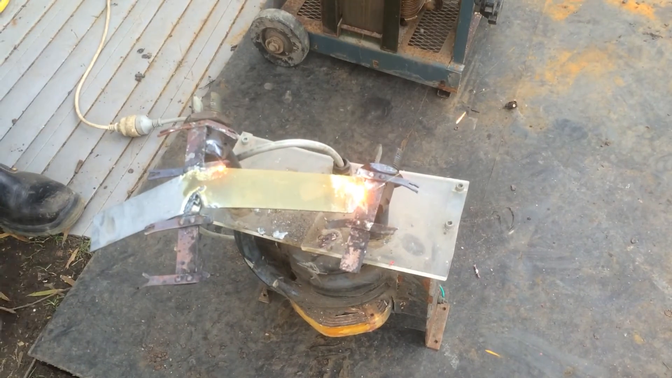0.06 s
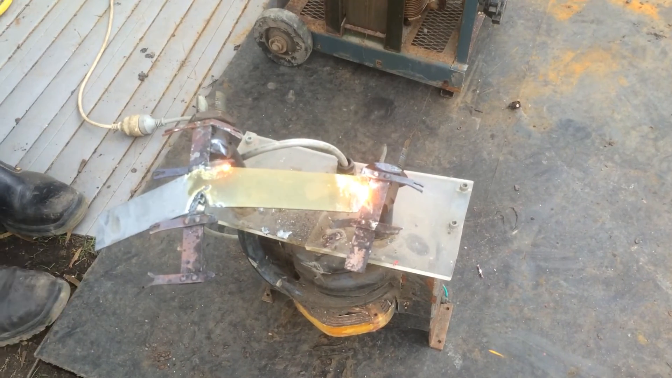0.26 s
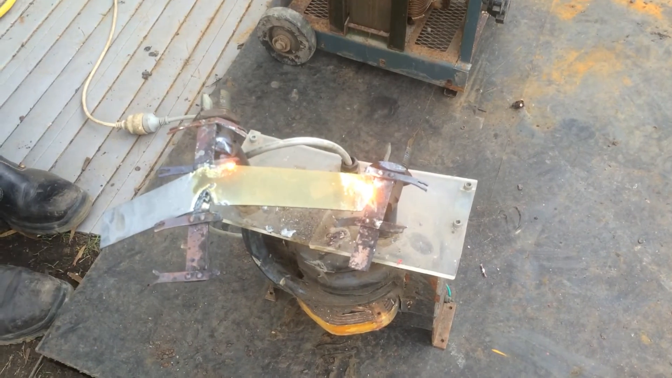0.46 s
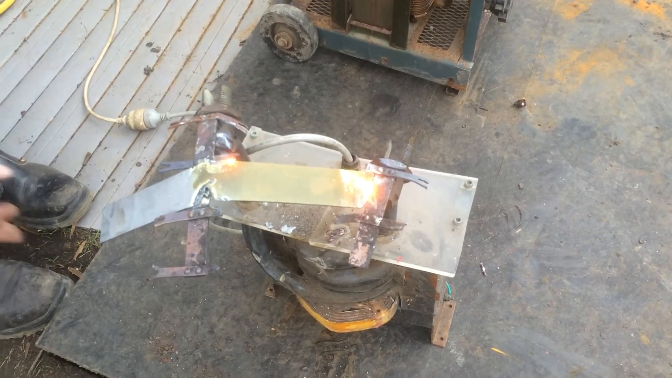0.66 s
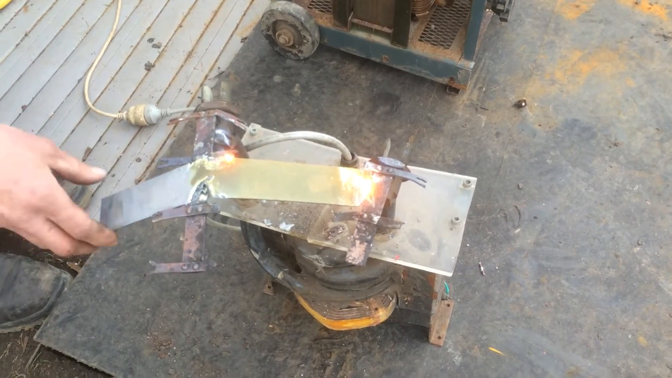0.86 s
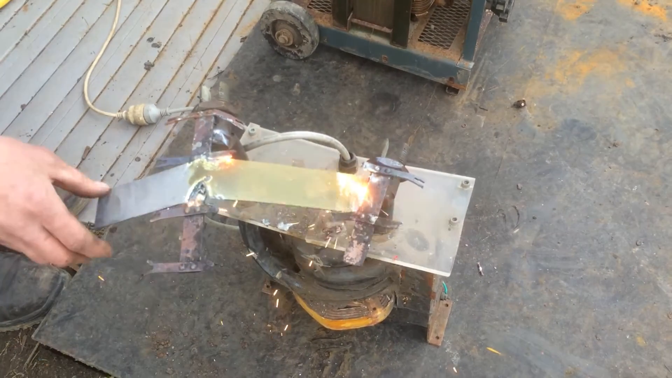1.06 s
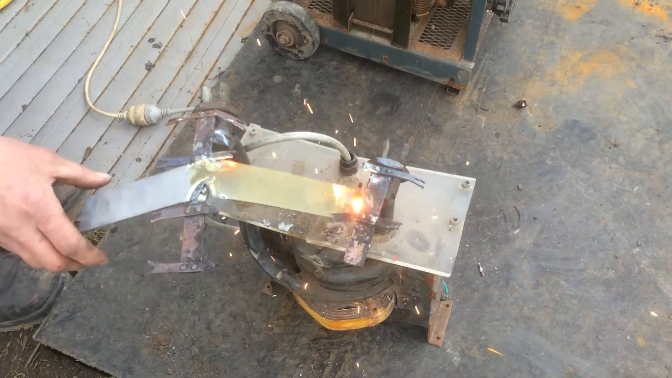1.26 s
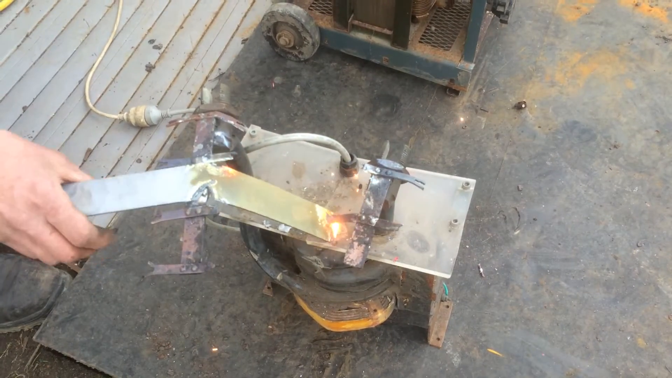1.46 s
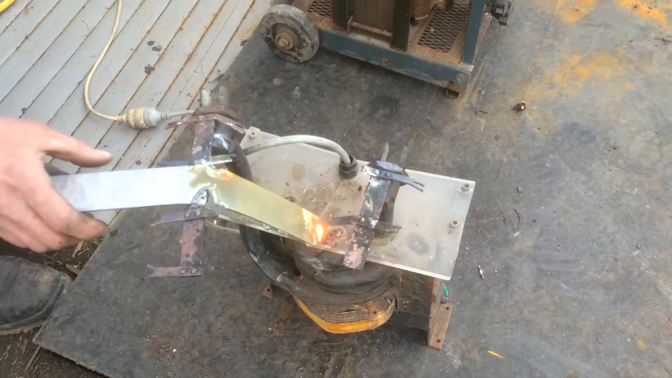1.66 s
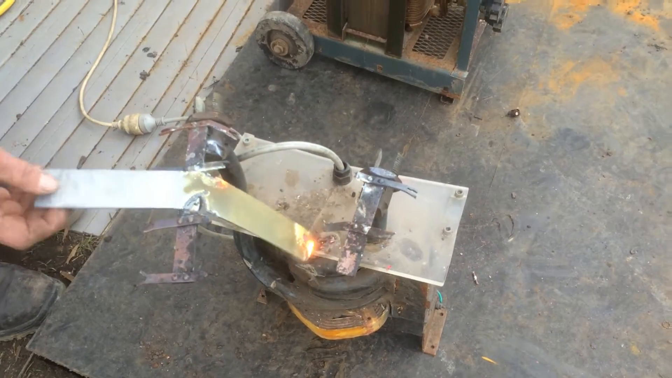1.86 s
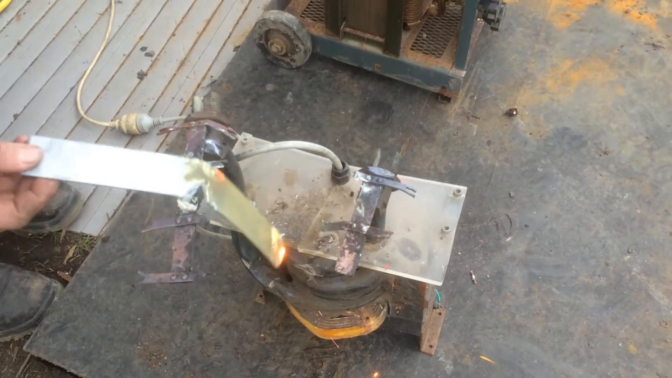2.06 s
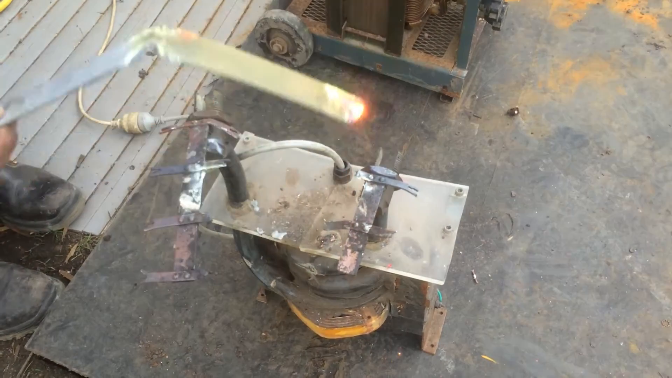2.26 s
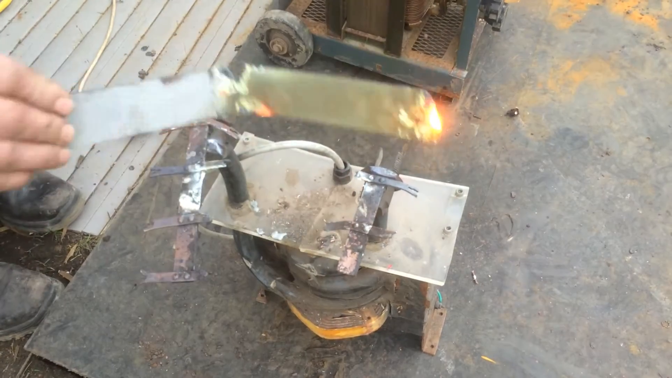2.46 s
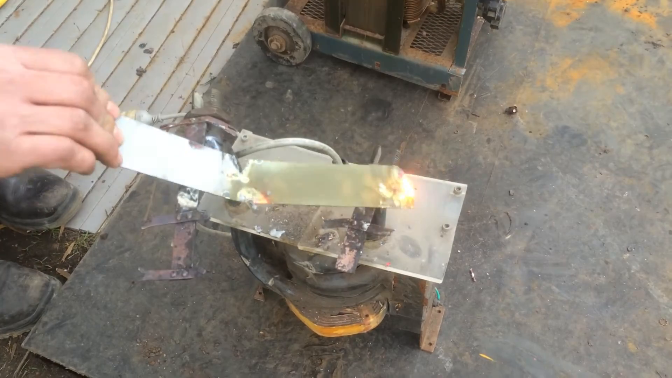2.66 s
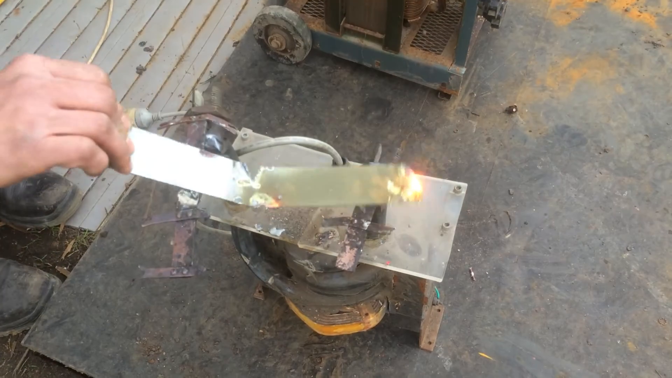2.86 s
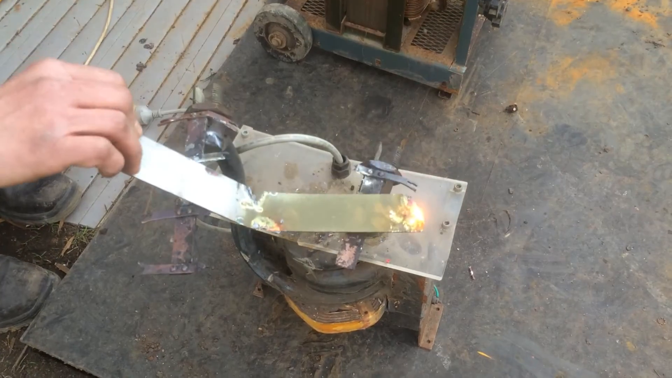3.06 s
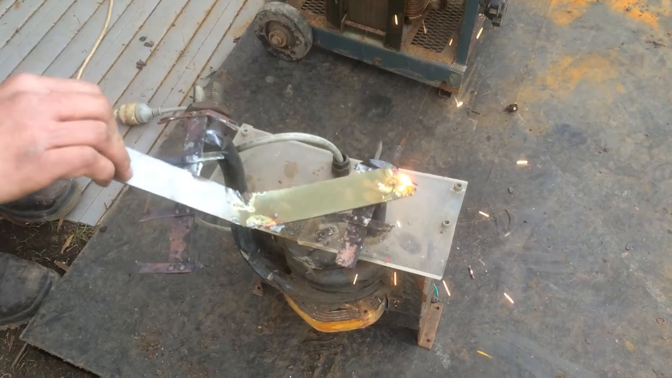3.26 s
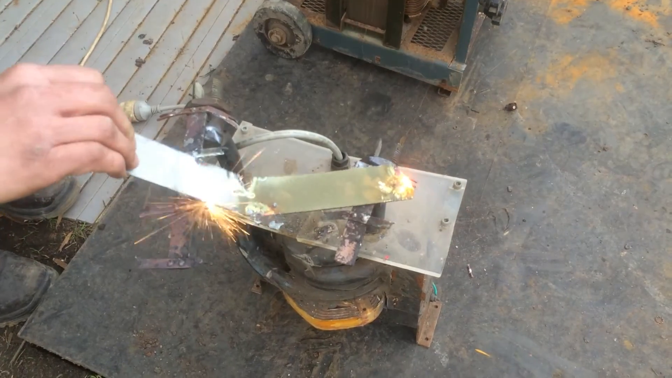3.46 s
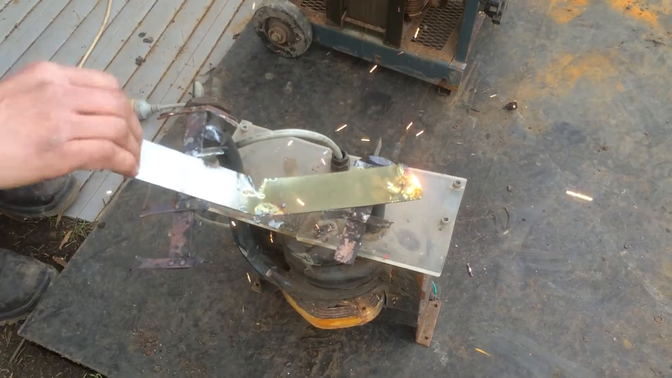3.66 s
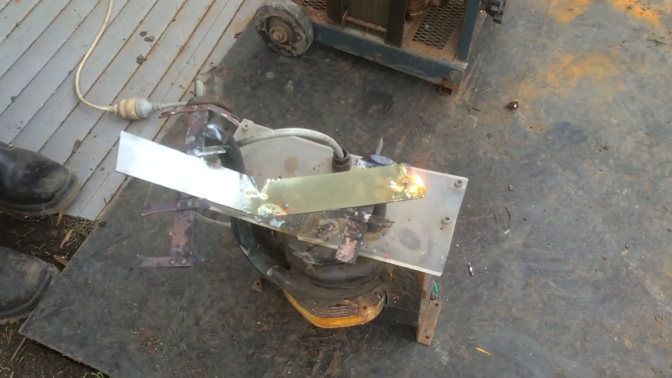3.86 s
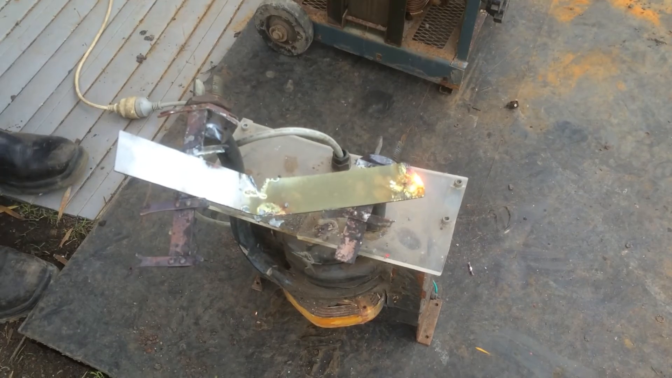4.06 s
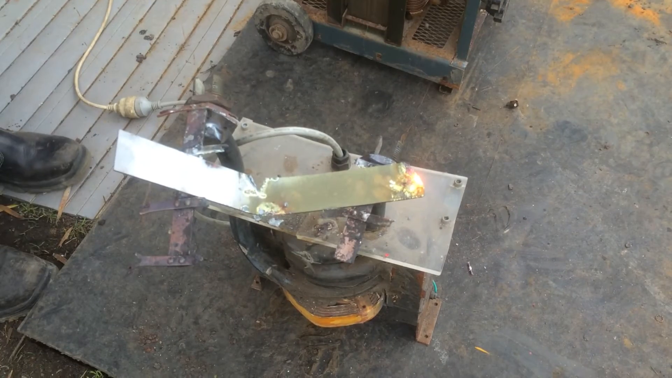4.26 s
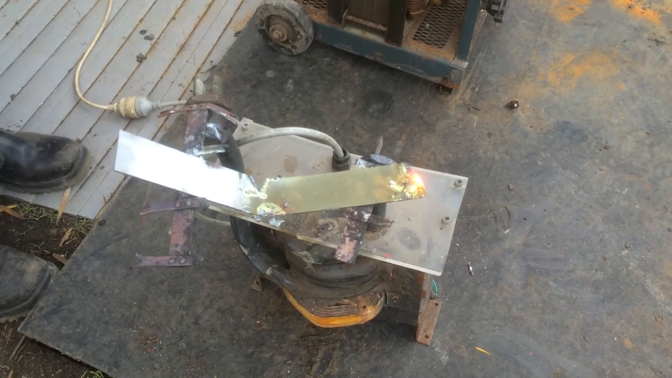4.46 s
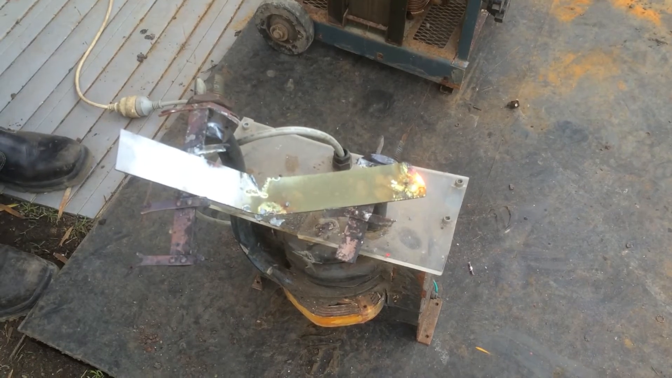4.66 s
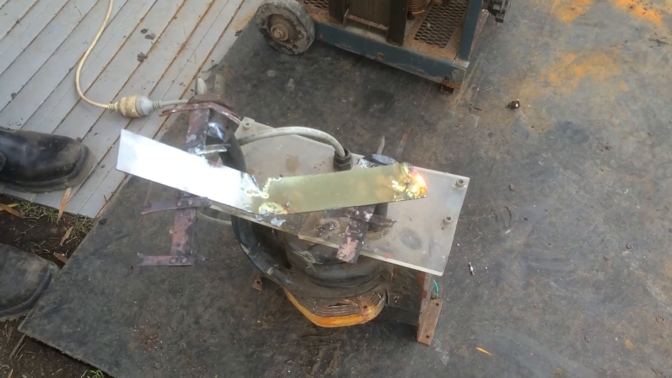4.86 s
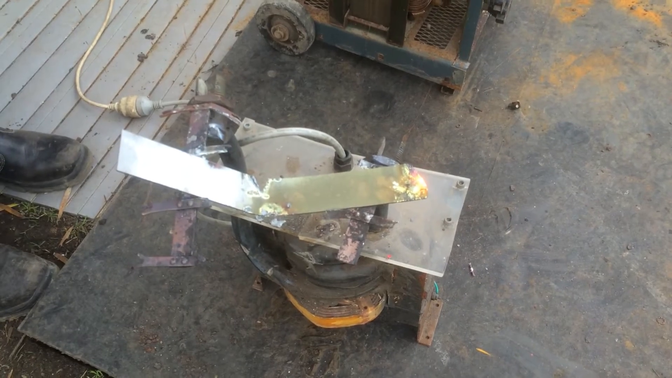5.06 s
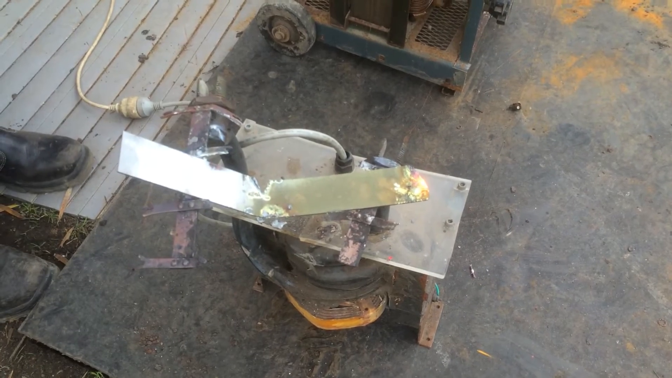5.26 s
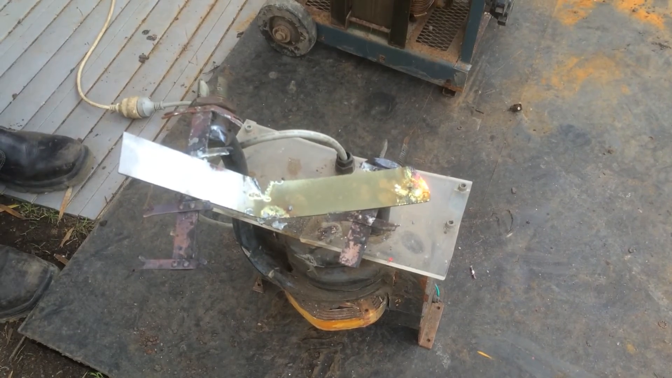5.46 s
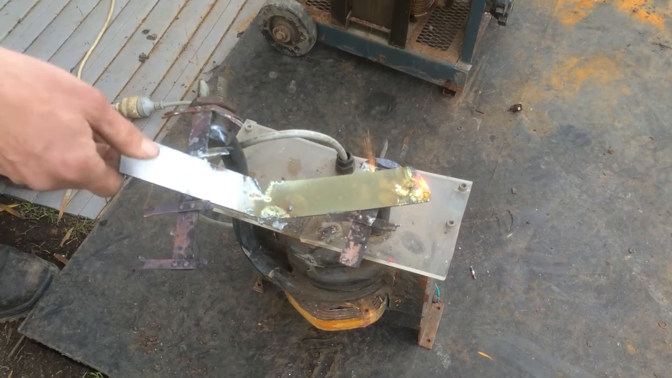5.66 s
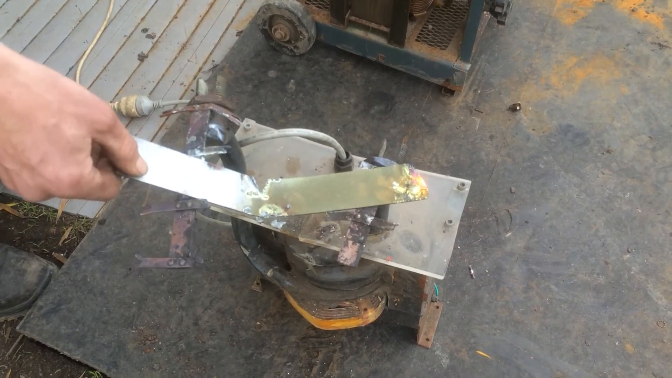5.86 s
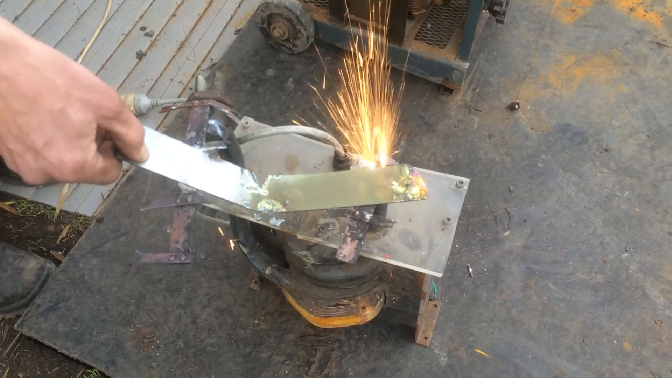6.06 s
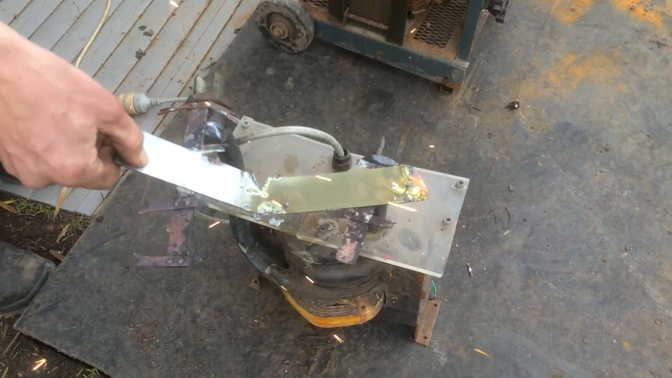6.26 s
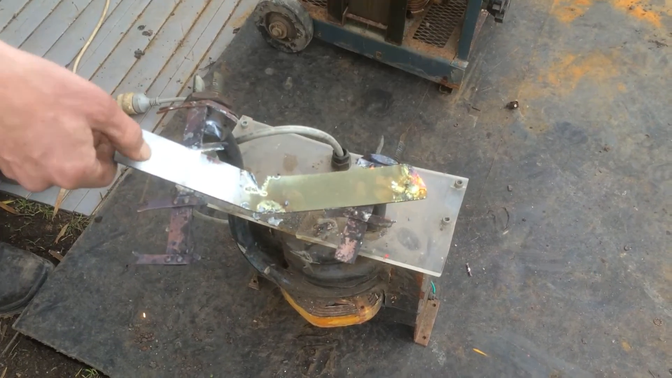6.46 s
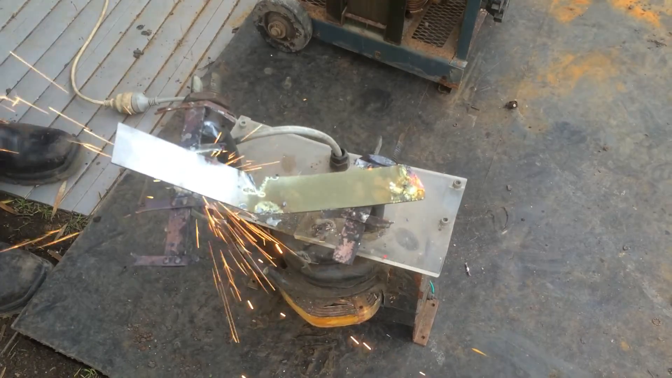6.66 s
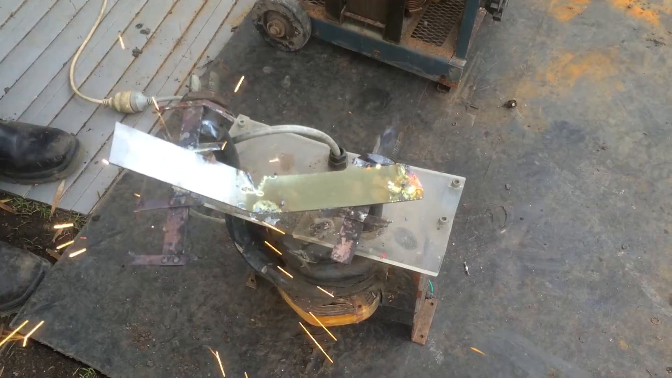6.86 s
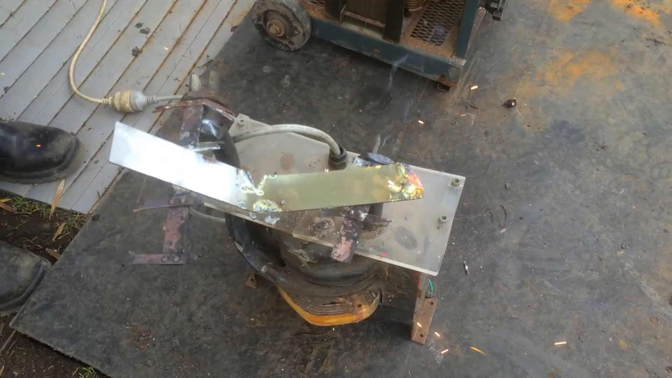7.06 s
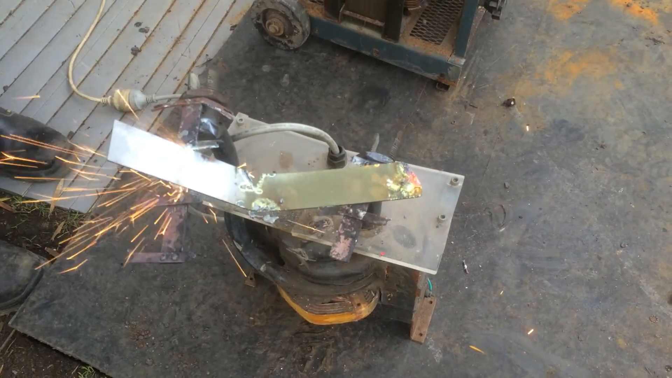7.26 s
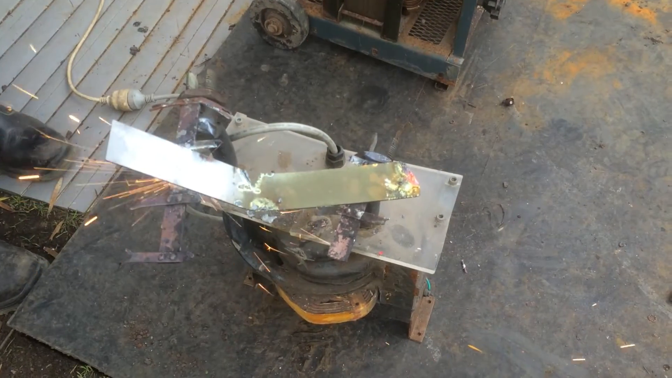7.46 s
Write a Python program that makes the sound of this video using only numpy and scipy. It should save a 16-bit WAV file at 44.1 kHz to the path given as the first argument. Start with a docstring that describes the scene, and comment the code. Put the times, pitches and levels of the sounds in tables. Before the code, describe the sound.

Loud, dry arcing snaps burst irregularly in clusters over a quiet yard, some jolting the microphone, trailing frying sizzle above a soft low engine hum.

```python
"""Arcing steel bar

Outdoors, a glowing steel bar pushed against the terminal of a home-made high-current transformer arcs in volleys.
Each spark is a noise crack and spray with a ground echo; the hardest blasts add decaying pressure jolts.
Between them come sizzle (hiss of leaping level), droplets (random ticks), and scrapes (resonant noise bands).
Behind lie two soft steps (dull noise bumps), open air (shaped noise), a sine hum and a slowing engine (two sines)."""
import sys
import numpy as np
from scipy import signal
from scipy.fft import rfft, irfft
from scipy.io import wavfile
from scipy.ndimage import minimum_filter1d

SR = 44100
rng = np.random.default_rng(int(sys.argv[2]) if len(sys.argv) > 2 else 0)


def digitize_waveform(pressure):
    """Quantize a signal to 16-bit integers and store it at the path in sys.argv[1].

    Rows of a 2-D input are taken as channels; values are limited to [-1, 1].
    """
    field = np.atleast_2d(pressure).T
    bounded = np.clip(field, -1, 1)
    quanta = np.round(bounded * 32767).astype(np.int16)
    wavfile.write(sys.argv[1], SR, quanta)


N = 331632

# the ground reflection, relative to the direct sound
GROUND_DELAY_S, GROUND_DB = .00232, -10.5


def from_db(db):
    """Amplitude ratio: 20 dB for each factor of ten."""
    return 10 ** (np.asarray(db) / 20)


def rms_one(x):
    """Energy normalization: scale to unit rms."""
    return x / np.sqrt(np.mean(x ** 2) + 1e-20)


def in_time(rows):
    """Linear interpolation: each column of a time curve, at every sample."""
    s, *columns = np.transpose(rows)
    return [np.interp(np.arange(N) / SR, s, c) for c in columns]


def cut(x, hz, kind, order=2):
    """Butterworth filtering: a maximally flat pass band."""
    return signal.sosfilt(signal.butter(order, np.clip(hz, 10, .45 * SR), kind, fs=SR, output="sos"), x)


def drift(rate):
    """Random modulation: chance values, rate per second, joined by straight lines; unit rms."""
    knots = rng.standard_normal(int(N / SR * rate) + 2)
    return rms_one(np.interp(np.arange(N) / SR * rate, np.arange(len(knots)), knots))


def coloured(x, spectrum, size=2048):
    """Minimum-phase filtering: folding the cepstrum makes a causal response with the given spectrum."""
    hz = np.maximum(np.arange(size + 1) * SR / (2 * size), 1)
    points = np.array(spectrum)
    gain_db = np.interp(np.log(hz), np.log(points[:, 0]), points[:, 1])
    cepstrum = irfft(np.log(from_db(gain_db)))
    cepstrum[1:size] *= 2
    cepstrum[size + 1:] = 0
    response = irfft(np.exp(rfft(cepstrum)))
    return signal.fftconvolve(x, response)[:len(x)]


def add(out, s, sound):
    """Superposition: mix a sound in at time s."""
    at = min(max(round(s * SR), 0), N - 1)
    out[at:at + len(sound)] += sound[:N - at]


def air_and_hum(hum_hz=101.1, hum_db=3, waver_db=3.0):
    """Broadband noise and a tone: shaped outdoor air, with a wavering hum that follows its level."""
    # open air: (time [s], level between 300 and 2000 Hz [dB])
    air_levels = [(0, -62.5), (1.3, -62.5), (2.6, -60.5), (3.8, -61), (4.3, -57), (4.9, -64), (5.7, -62),
                  (6.1, -64), (7.5, -63.5)]
    # spectrum of open air: (frequency [Hz], relative gain [dB])
    air_spectrum = [(20, -23), (65, -3), (160, -5.5), (380, -19), (1100, -19.5), (1900, -23), (2700, -34),
                    (6000, -40.5), (15000, -53)]
    level_db, = in_time(air_levels)
    air = coloured(rng.standard_normal(N), air_spectrum)
    air = air / np.std(cut(air, [300, 2000], "band"))
    hum = np.sqrt(2) * np.sin(2 * np.pi * hum_hz * np.arange(N) / SR)
    wavering_hum = from_db(hum_db + waver_db * drift(15)) * hum
    return from_db(level_db) * (air + wavering_hum)


def engine(second_db=-21.5, waver_db=3.5):
    """Harmonic radiation: only the firing rate and a trace of its octave carry this far."""
    # distant engine: (time [s], firing rate [Hz], level of the fundamental before its waver [dB])
    engine_course = [(0, 96, -70.5), (1.35, 92.6, -57), (1.52, 90.2, -51.5), (2.55, 88.34, -50.5),
                     (3.5, 79, -52.5), (4.1, 76.6, -72.5), (4.4, 77.1, -60.5), (4.8, 71.8, -65),
                     (5.15, 69.93, -51.5), (7.5, 66.6, -61.5)]
    hz, level_db = in_time(engine_course)
    phase = 2 * np.pi * np.cumsum(hz) / SR
    tone = np.sin(phase) + from_db(second_db) * np.sin(2 * phase)
    return np.sqrt(2) * from_db(level_db + waver_db * drift(3.7)) * tone


def steps(low_hz=100, top_hz=230, fall_s=0.014, scuff_db=-15, scuff_top_hz=1600, size=6000):
    """Damped impact: a boot shifts on the mat, a dull decaying bump with a light scuff of the sole."""
    # soft steps beside the rig: (time [s], peak level [dB])
    footfalls = [(0.318, -38), (.402, -45)]
    out, fade = np.zeros(N), np.exp(-np.arange(size) / SR / fall_s)
    for s, db in footfalls:
        heel, sole = rng.standard_normal((2, size))
        thud = rms_one(cut(heel, [low_hz, top_hz], "band"))
        scuff = from_db(scuff_db) * rms_one(cut(sole, scuff_top_hz, "low"))
        bump = fade * (thud + scuff)
        add(out, s, from_db(db) * bump / np.abs(bump).max())
    return out


def scrapes():
    """Friction-driven resonance: rubbing sets the bar's modes singing for a moment."""
    # the bar drags over the terminal: (time [s], length [s], level [dB])
    rubs = [(3.004, .055, -57.5), (3.065, 0.029, -59), (3.203, 0.27, -65.5), (3.753, 0.053, -38)]
    # resonances of the dragged bar: (frequency [Hz], bandwidth [Hz], relative level [dB])
    bar_modes = [(1500, 630, -1.5), (5550, 360, -12), (6490, 350, -2.5)]
    rub = np.zeros(N)
    for s, length_s, db in rubs:
        size = round(length_s * SR)
        add(rub, s, from_db(db) * signal.windows.tukey(size))
    rings = np.zeros(N)
    for hz, width, db in bar_modes:
        mode = cut(rng.standard_normal(N), [hz - width / 2, hz + width / 2], "band", order=1)
        rings += from_db(db) * rms_one(mode)
    return rub * rms_one(rings)


def droplets(low_hz=8000, per_s=160, spread_db=21, tick_s=.0003):
    """Random impulse process: droplets burst, most faintly, in bright ticks that the ground echoes."""
    # showers of flying droplets: (time of the thickest [s], level there [dB], Gaussian spread in time [s])
    showers = [(.3, -68, 0.49), (1.6, -69, .28), (4.2, -77.5, .2), (5.3, -74, 0.32), (6.31, -43, 0.063),
               (6.6, -49, 0.12), (6.9, -47.5, .08), (7.45, -55, 0.084)]
    t = np.arange(N) / SR
    shower = sum(from_db(db) * np.exp(-.5 * ((t - s) / swell_s) ** 2) for s, db, swell_s in showers)
    bursts = (rng.random(N) < per_s / SR) * from_db(-spread_db * np.sqrt(rng.random(N)))
    bursts += from_db(GROUND_DB) * np.roll(bursts, round(GROUND_DELAY_S * SR))
    decays = signal.lfilter([1], [1, -np.exp(-1 / (tick_s * SR))], bursts + 1e-18)
    ticks = decays * rng.standard_normal(N)
    return shower * rms_one(cut(ticks, low_hz, "high"))


def sizzle(grain_db=4.5, grains_per_s=700, boil_attack_s=.004, boil_fall_db_per_s=204.5):
    """Modulated noise: the glowing tip hisses and boils up after arcs, its level leaping each millisecond or so."""
    # faint hiss of the glowing tip: (time [s], level [dB])
    glow = [(0, -64.5), (.8, -64), (1.5, -67.5), (2.5, -75), (3.3, -71.5), (3.9, -74), (4.2, -70),
            (4.9, -80), (5.6, -77), (5.78, -62), (6.0, -75), (7.5, -64.5)]
    # the steel boils up after an arc: (time [s], level from which it falls [dB])
    boils = [(1.017, -27), (1.225, -32.5), (1.28, -64), (3.315, -34.5), (3.59, -31.5), (3.68, -30.5),
             (5.8, -36), (6.775, -39), (7.04, -42.5), (7.41, -48.5)]
    # spectrum of the sizzle: (frequency [Hz], relative gain [dB])
    sizzle_spectrum = [(1500, -13.5), (3000, -10.5), (5200, -11), (7000, -7.5), (15000, -14)]
    glow_db, = in_time(glow)
    power = from_db(glow_db) ** 2
    for s, db in boils:
        age = np.maximum(np.arange(N) / SR - s, 0)
        attack = np.minimum(age / boil_attack_s, 1)
        power += (attack * from_db(db - boil_fall_db_per_s * age)) ** 2
    level_db = 10 * np.log10(power)
    hiss = coloured(rng.standard_normal(N), sizzle_spectrum)
    fierce = np.clip((level_db + 70) / 20, 0, 1)   # the louder it boils, the grainier
    return from_db(level_db + fierce * grain_db * drift(grains_per_s)) * rms_one(hiss)


def yard(x, wet_db=-19.5, t60=.22, low_hz=500, size=24000):
    """Reverberation: walls and clutter return a thin tail that falls by 60 dB in t60 seconds."""
    noise = cut(rng.standard_normal(size), low_hz, "high", order=1)
    tail = noise * from_db(-60 * np.arange(size) / SR / t60)
    return from_db(wet_db) * signal.fftconvolve(x, rms_one(tail) / np.sqrt(size))[:N]


def thumps(low_hz=45, top_hz=4000, swing_db=7.5, fall_s=0.00049, size=1024):
    """Pressure impulse: a blast pushes the diaphragm, then pulls it; the recorder's bass filter swings around it."""
    # blasts: (time [s], push before filtering [dB], following pull relative to the push [dB])
    blasts = [(0.9974, -6.5, -12.5), (1.2163, -5, -30), (3.5911, -4, -25), (3.679, 1, 3), (3.698, -8.5, 15),
              (3.811, 7.5, -32), (6.1919, 3.5, -16), (6.2823, -17.5, 14.5), (7.0151, -6.5, -30)]
    out, jolt = np.zeros(N), np.exp(-np.arange(size) / SR / fall_s)
    for s, db, pull_db in blasts:
        add(out, s, from_db(db) * jolt)
        add(out, s + GROUND_DELAY_S, -from_db(db + pull_db) * jolt)
    # filtered both ways in time, the swing surrounds each jolt
    swing_filter = signal.butter(1, [45, 100], "band", fs=SR, output="sos")
    swing = signal.sosfiltfilt(swing_filter, out + 1e-18)
    return cut(cut(out, low_hz, "high"), top_hz, "low", order=1) + from_db(swing_db) * swing


def spark(body_db, spit, clutter, crack_s=.0001, spit_s=0.0037, grain_db=4.0):
    """Impulsive discharge: a crack, a spray of tiny bursts and a ground echo; unit treble level over 5 ms."""
    # spectrum within the spark's body and treble: (frequency [Hz], relative gain [dB])
    spark_spectrum = [(100, -35.5), (300, -17), (620, -9), (950, -11), (1300, -4.5), (1750, -5.5),
                      (2700, -12), (3500, 1), (4400, 4.5), (5300, 1.5), (7300, 9.5), (10500, 9),
                      (13500, 6.5)]
    size = len(clutter)
    t = np.arange(size) / SR
    crack = rms_one(np.exp(-t / crack_s) * (rng.standard_normal(size) + 3.5 * (t == 0)))
    grains = rng.standard_normal(size) * from_db(grain_db * rng.standard_normal(size))
    spray = rms_one(np.exp(-t / spit_s) * grains)
    direct = np.sqrt(1 - spit) * crack + np.sqrt(spit) * spray   # spit is the spray's share of energy
    echo = from_db(GROUND_DB) * np.roll(direct, round(GROUND_DELAY_S * SR * rng.uniform(.92, 1.08)))
    # the rig scatters a short tail, partly the same for every spark
    scatter = from_db(-10) * rms_one(np.exp(-t / .005) * (clutter + rng.standard_normal(size)))
    sound = coloured(direct + echo + scatter, spark_spectrum)
    treble = cut(sound, 2500, "high", order=3)
    body = cut(sound, 2500, "low", order=3)
    return (rms_one(treble) + from_db(body_db) * rms_one(body)) * np.sqrt(.005 * SR / size)


def arcs(size=2048):
    """Periodic re-ignition: an arc strikes on each mains half-cycle, unevenly and on average ever weaker."""
    # strikes: (time [s], treble level [dB], body relative to treble [dB], burning time [mains half-cycles])
    strikes = [(0.837, -42.5, -23, 1), (0.9852, -29, -8, 1), (0.9979, -12.5, -7, 1), (1.016, -15.5, -3, 1),
               (1.076, -13.5, -8, 1), (1.1366, -28.5, -6, 1), (1.1788, -21, -3, 2), (1.2167, -14, -11, 1),
               (1.2356, -20, -11, 3), (1.2853, -19.5, -9, 2), (1.599, -49, -11, 1), (1.755, -49, -8, 1),
               (2.8311, -39, -9.5, 1), (2.982, -44, -4.5, 2), (3.2528, -47.5, -1, 1),
               (3.3094, -12.5, -5, 1), (3.537, -30.5, -10.5, 1), (3.5665, -27, -12, 1),
               (3.5797, -16, -5.5, 2), (3.6388, -22, -5.5, 1), (3.6591, -11, -8, 6), (3.811, -12, -14, 1),
               (5.792, -17.5, -11.5, 2), (5.8327, -17, -9, 1), (6.1432, -19, -8.5, 2),
               (6.1714, -14.5, -12, 1), (6.1813, -15.5, -7.5, 2), (6.2095, -21, -4.5, 1),
               (6.2824, -11, -10.5, 1), (6.32, -29.5, -4, 1), (6.6339, -21, -7.5, 5),
               (6.7714, -15.5, -7, 1), (6.945, -29, -9.5, 1), (6.996, -30.5, -3.5, 1),
               (7.0039, -15, -14, 4), (7.1212, -30.5, -17.5, 1), (7.253, -29, -17.5, 1),
               (7.3132, -25.5, -16, 1), (7.3725, -19.5, -10.5, 5)]
    half_cycle_s, jitter_s = .01, .0013
    loss_db, spread_db, body_spread_db = 1, 0.9, 4   # restrikes: loss per half-cycle, then random spreads
    spit_share, spit_spread = 0.41, 0.068   # share of energy spat out after the crack
    leader_s, leader_db = 0.0087, -27   # a faint spark runs ahead of each arc
    out, clutter = np.zeros(N), rng.standard_normal(size)
    for s, db, body_db, half_cycles in strikes:
        add(out, s - leader_s, from_db(db + leader_db) * spark(body_db, spit_share, clutter))
        for k in range(max(round(half_cycles), 1)):
            late, louder, fuller = rng.standard_normal(3) * (k > 0)   # the first strike is exact
            at = s + k * half_cycle_s + jitter_s * late
            spark_db = db - k * loss_db + spread_db * louder
            spit = np.clip(spit_share + spit_spread * rng.standard_normal(), 0, 1)
            add(out, at, from_db(spark_db) * spark(body_db + body_spread_db * fuller, spit, clutter))
    return out


def gain_control(x, above_db=-26, share=0.6, average_s=0.063, hold_s=0.18):
    """Dynamic compression: loud volleys push the recorder's gain down; it holds for a moment and recovers."""
    keep, half_hold = np.exp(-1 / (average_s * SR)), round(hold_s * SR / 2)
    power = signal.lfilter([1 - keep], [1, -keep], x ** 2)
    level_db = 10 * np.log10(power + 1e-12)
    duck_db = -share * np.maximum(level_db - above_db, 0)
    # the lowest gain of the past hold time
    held_db = minimum_filter1d(duck_db, 2 * half_hold + 1, origin=half_hold, mode="nearest")
    return x * from_db(held_db)


def scene():
    """Superposition of sources: the arcs close by, over the quiet of the yard."""
    background = air_and_hum() + engine() + steps()
    cracks = arcs()
    rig = scrapes() + droplets() + sizzle() + yard(cracks) + thumps() + cracks
    return (background + rig)[None]


def record(dry, top=.66, cutoff_hz=15300):
    """Saturation and band limiting: the gain ducks, peaks round off below top, and the highest treble is cut."""
    rounded = top * np.tanh(gain_control(dry) / top)
    return signal.sosfilt(signal.ellip(10, .2, 75, cutoff_hz, fs=SR, output="sos"), rounded)


dry = scene()
out = record(dry)
digitize_waveform(out)
```